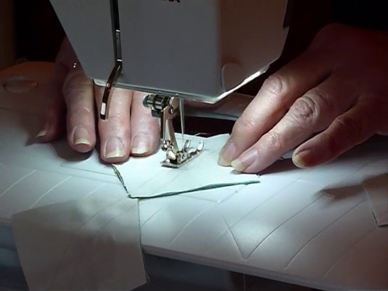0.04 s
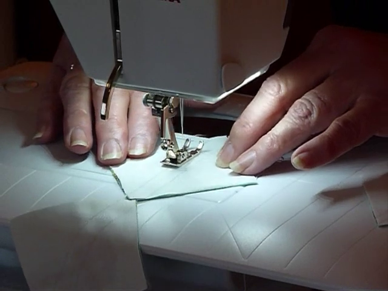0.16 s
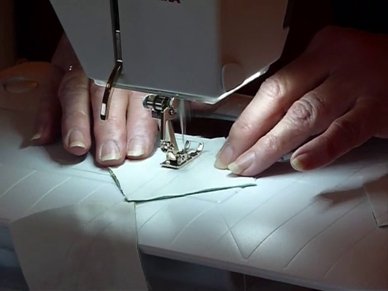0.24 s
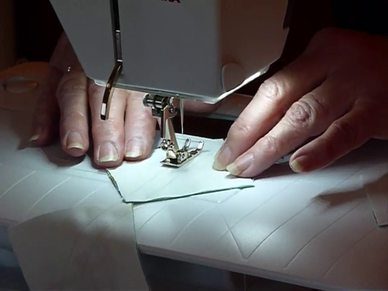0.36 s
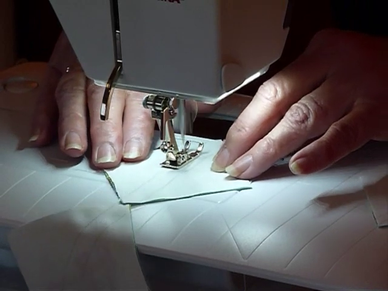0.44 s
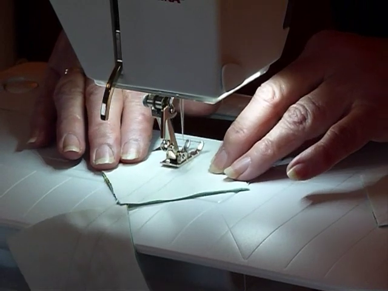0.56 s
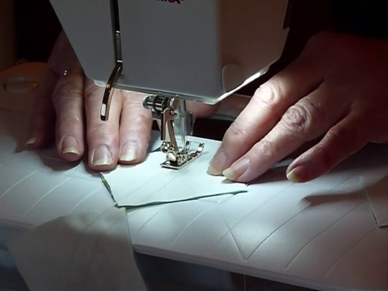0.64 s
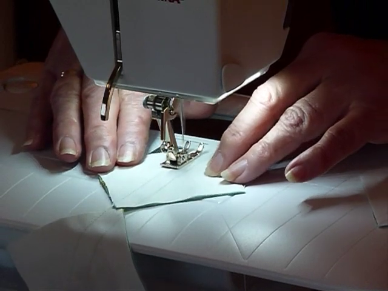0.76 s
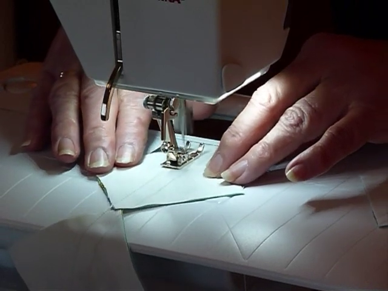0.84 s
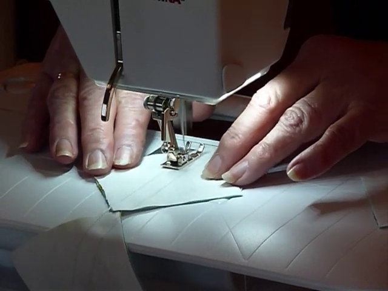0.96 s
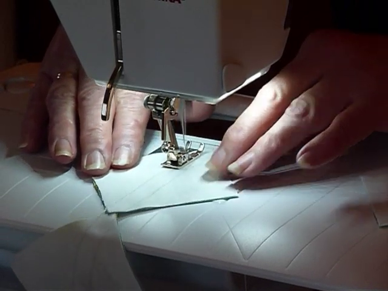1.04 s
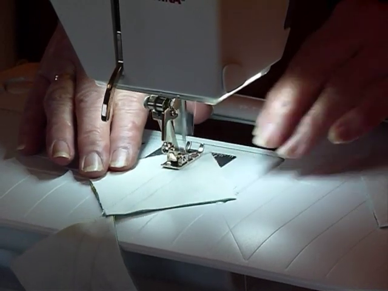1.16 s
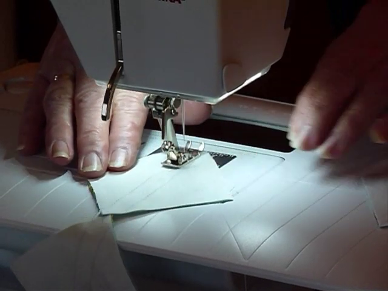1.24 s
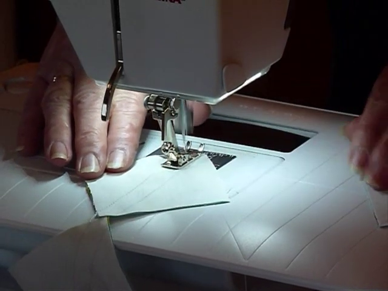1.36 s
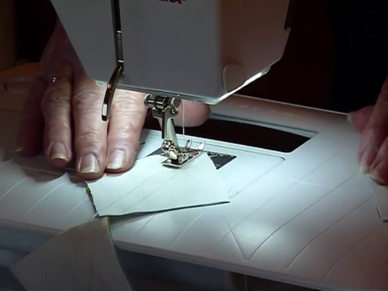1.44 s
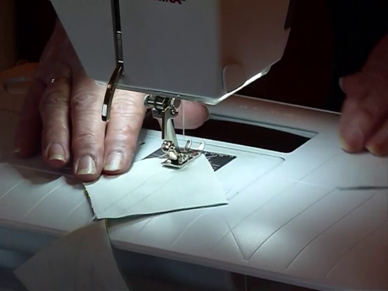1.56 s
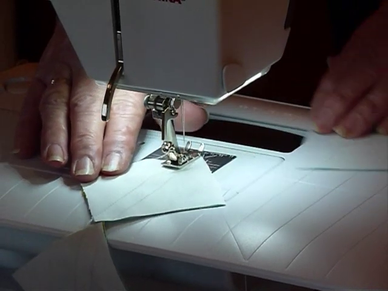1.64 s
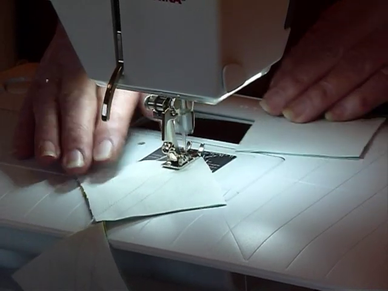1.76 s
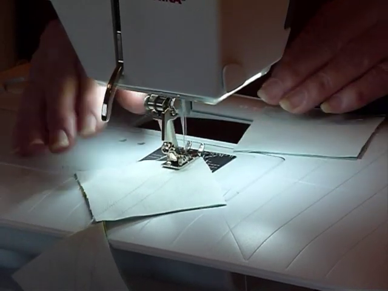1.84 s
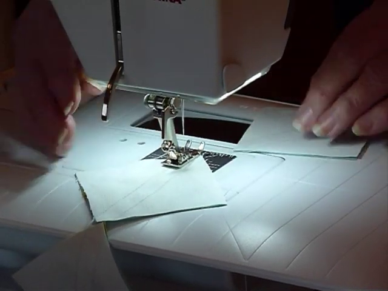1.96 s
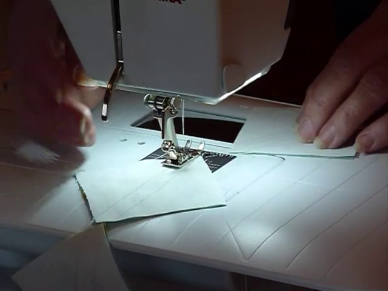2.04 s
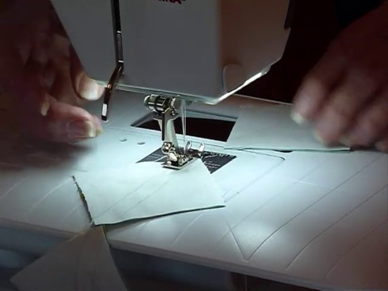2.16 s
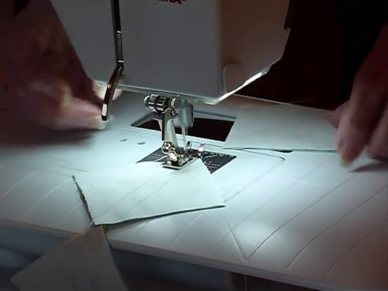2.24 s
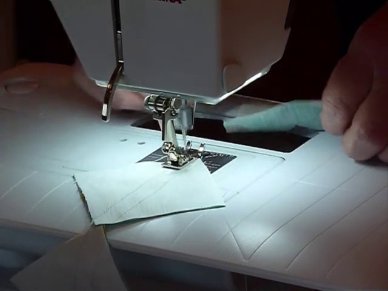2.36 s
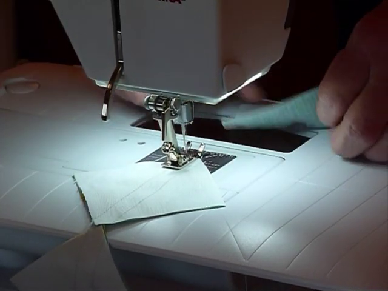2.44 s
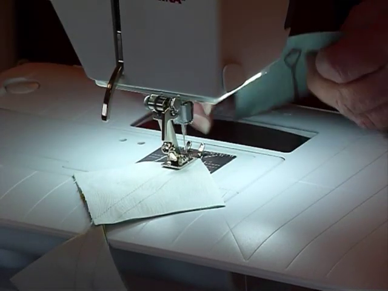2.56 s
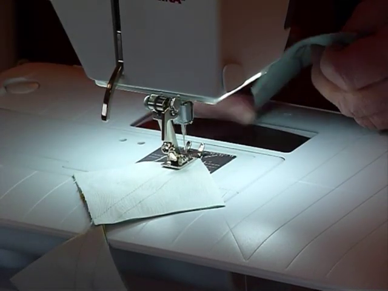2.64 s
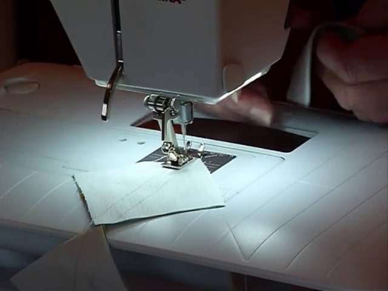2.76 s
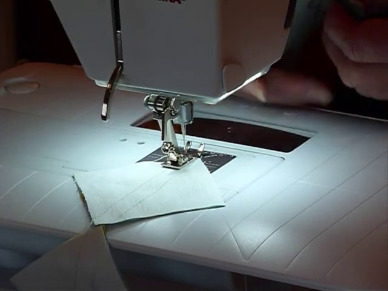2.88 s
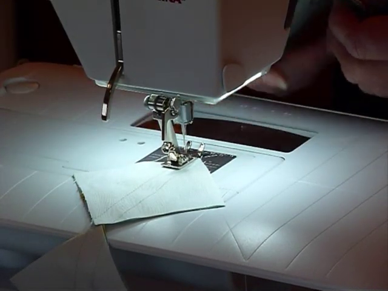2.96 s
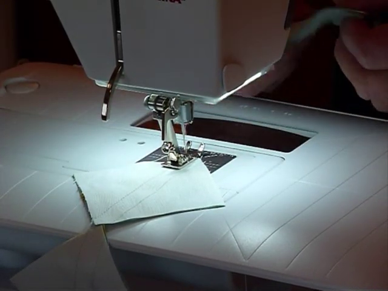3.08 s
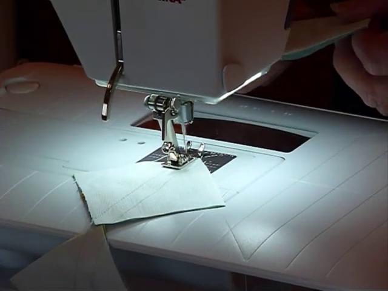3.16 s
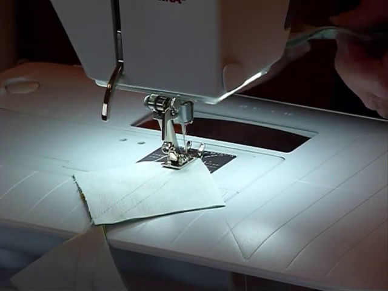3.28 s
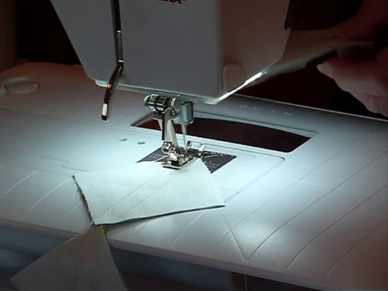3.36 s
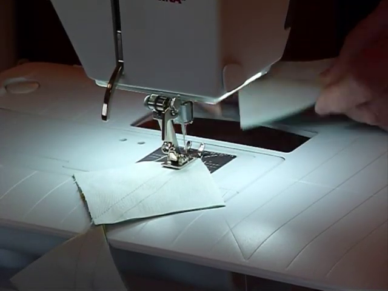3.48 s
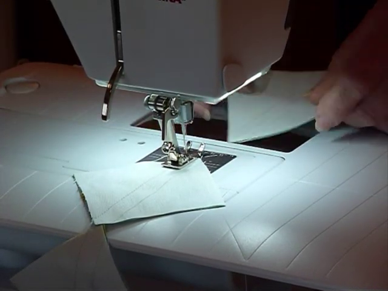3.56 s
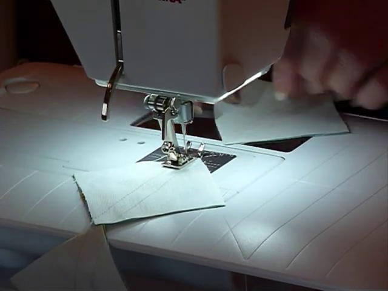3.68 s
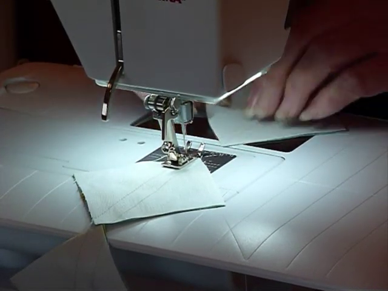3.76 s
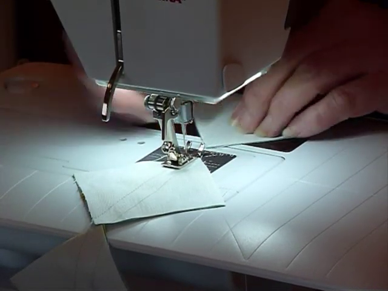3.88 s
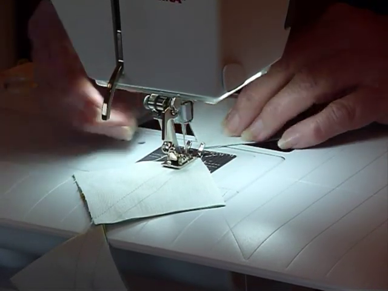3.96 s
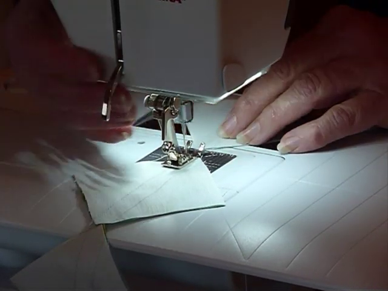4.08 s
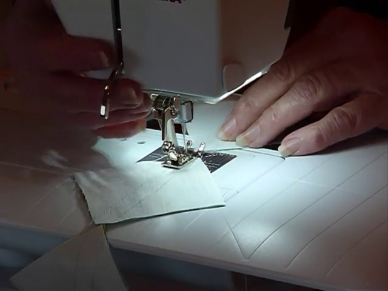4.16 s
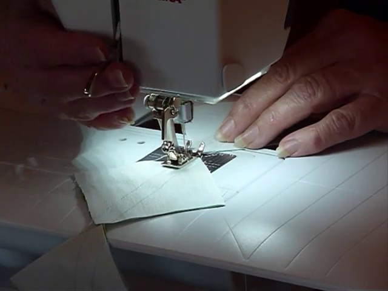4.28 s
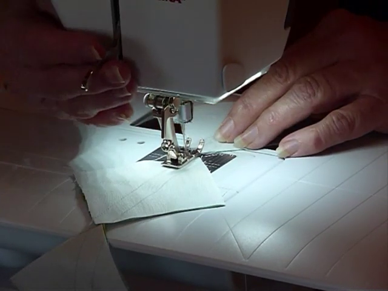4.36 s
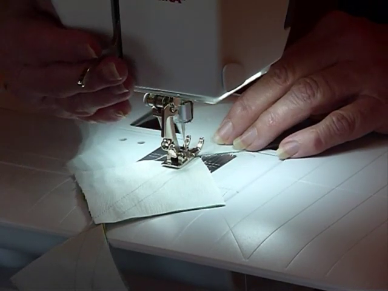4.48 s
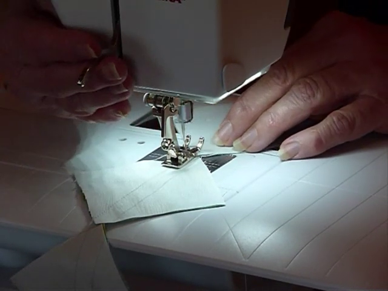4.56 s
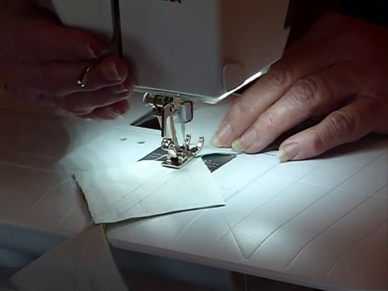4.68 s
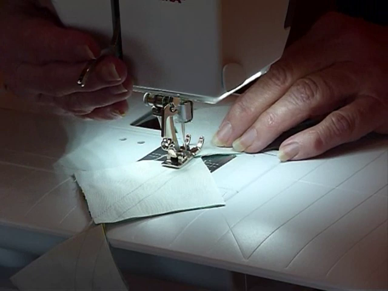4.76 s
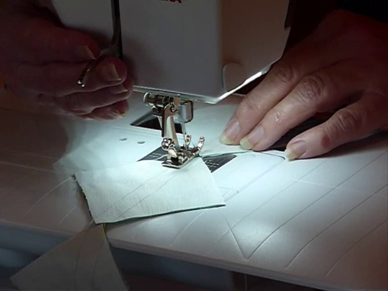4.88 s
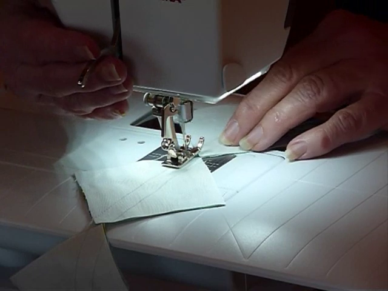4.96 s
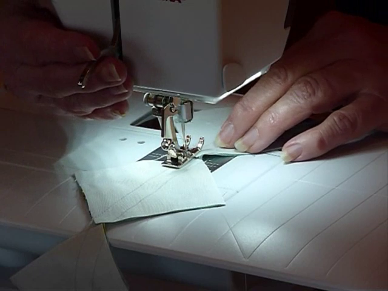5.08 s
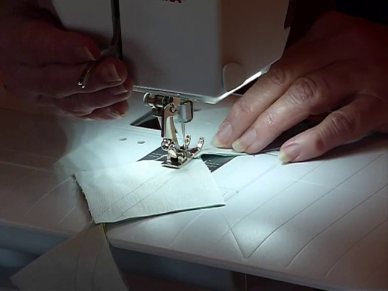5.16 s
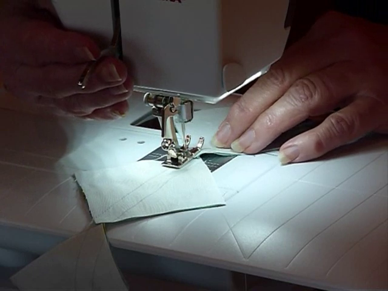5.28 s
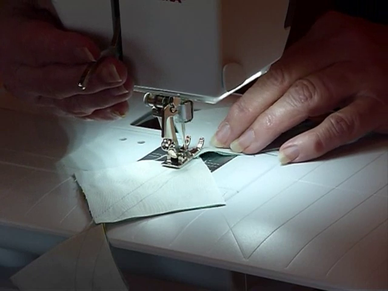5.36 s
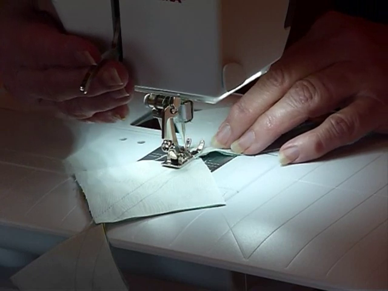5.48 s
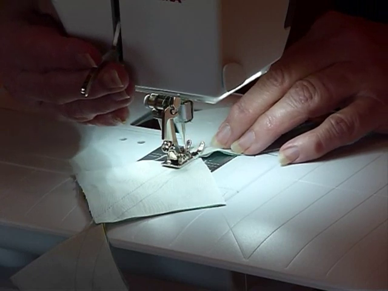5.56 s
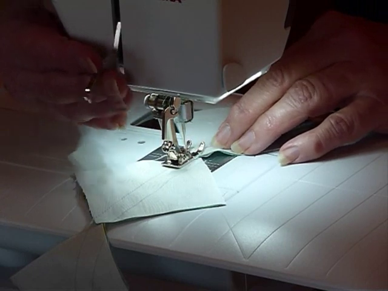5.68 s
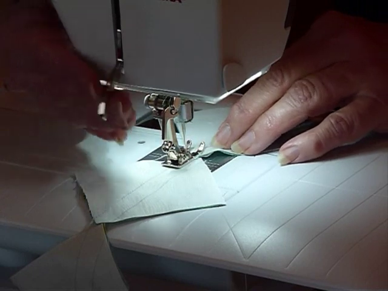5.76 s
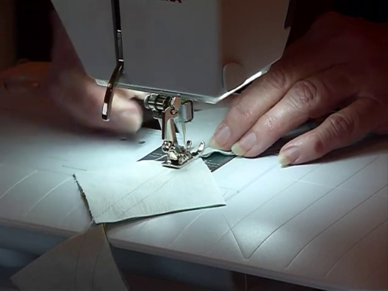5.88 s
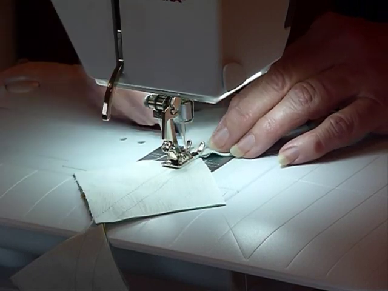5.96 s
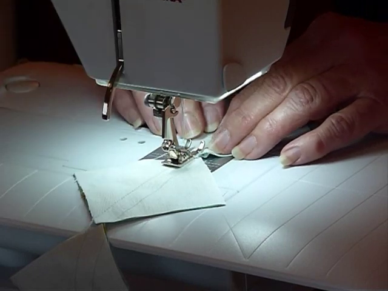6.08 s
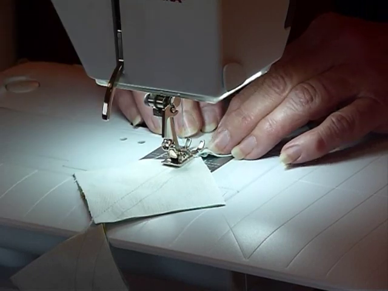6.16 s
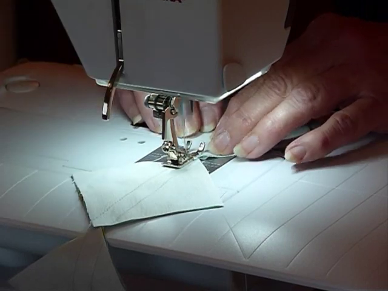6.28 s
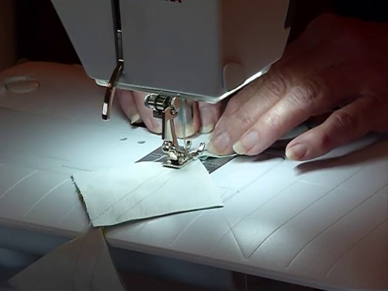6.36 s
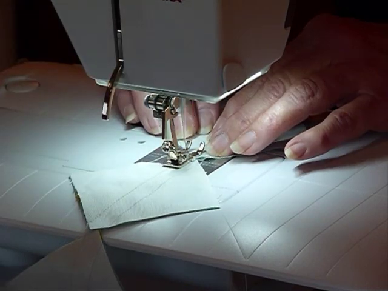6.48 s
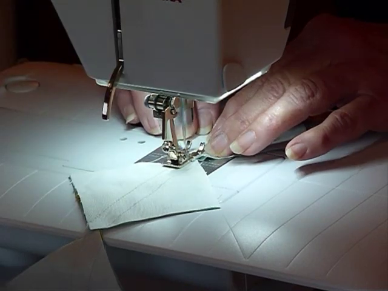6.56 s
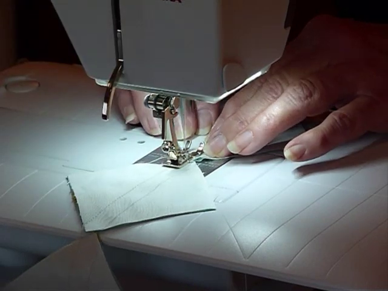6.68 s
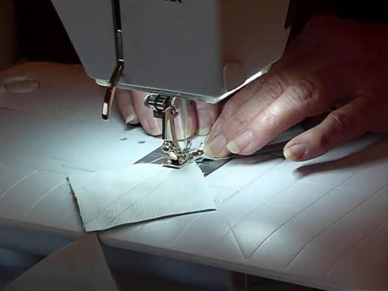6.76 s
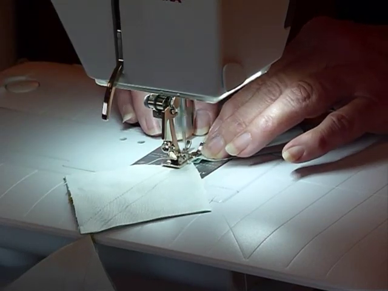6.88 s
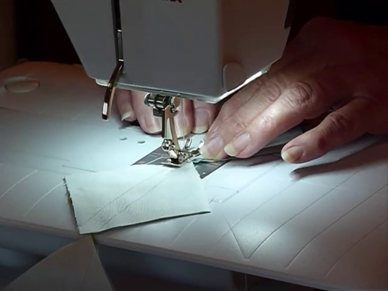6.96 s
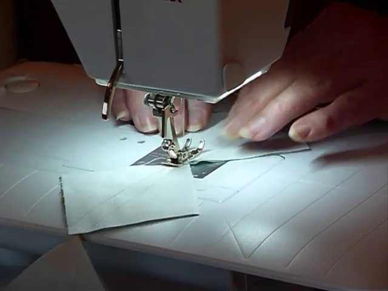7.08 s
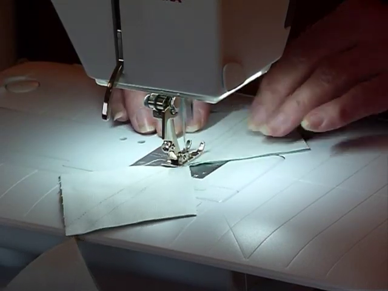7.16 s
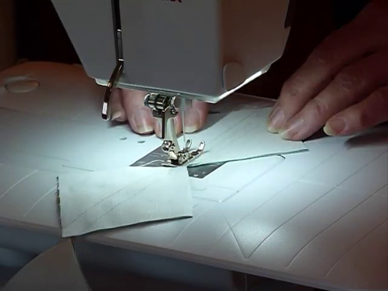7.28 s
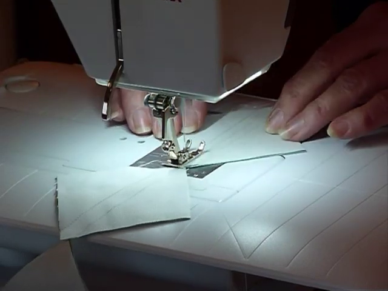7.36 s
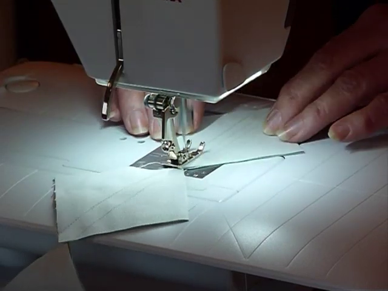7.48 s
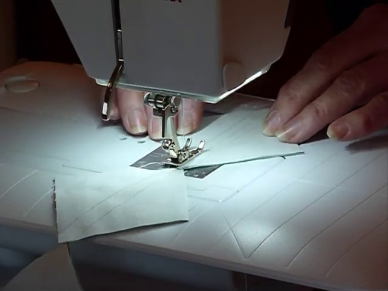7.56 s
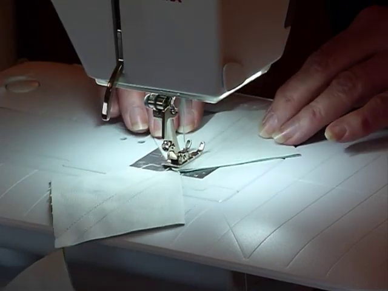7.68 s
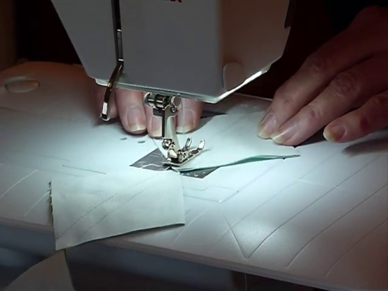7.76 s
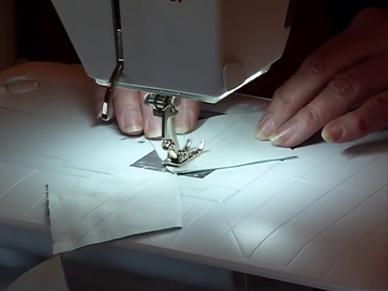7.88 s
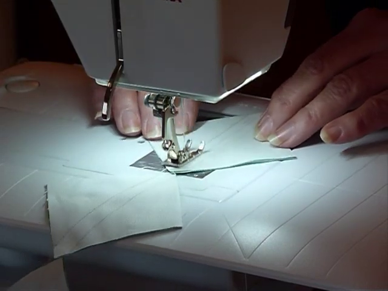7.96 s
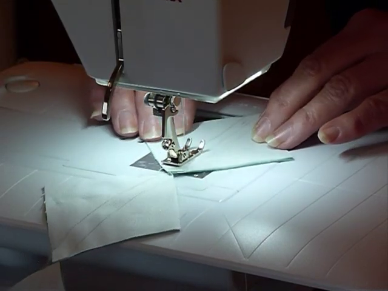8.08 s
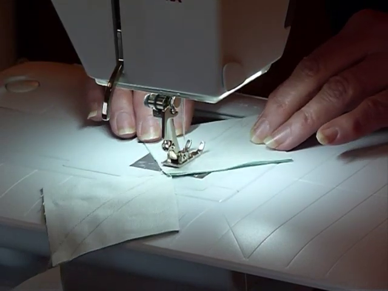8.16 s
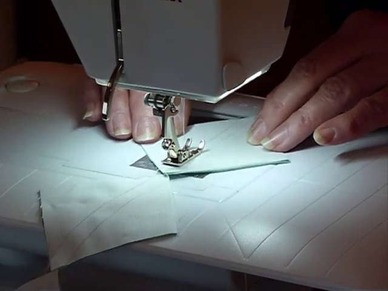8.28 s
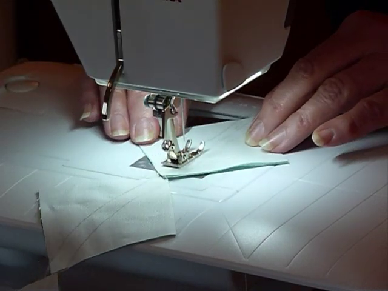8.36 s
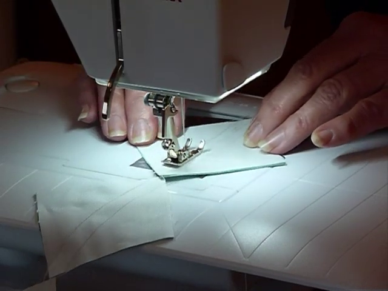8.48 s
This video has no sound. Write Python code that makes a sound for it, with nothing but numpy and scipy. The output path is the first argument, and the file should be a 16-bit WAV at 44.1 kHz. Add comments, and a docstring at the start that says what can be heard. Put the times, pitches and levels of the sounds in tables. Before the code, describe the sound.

Brisk mechanical stitching winds down and stops on a bright latch snap; soft table bumps and presser-foot clicks follow before the machine speeds up again.

```python
"""An electric sewing machine stitches patchwork in a small room, slows down and halts with a sprung metal clack.
Hands fetch the next piece and bump the table, the presser foot is lifted and dropped, and the machine runs up again.
The shaft angle times everything that turns: a round of noise knocks, ringing bed and plate, whirr, hum and whine.
Single blows are dying noise bursts or ringing modes; cloth, straining motor and room air are coloured noise."""
import sys
import numpy as np
from scipy import signal
from scipy.fft import rfft, irfft, next_fast_len
from scipy.io import wavfile
from scipy.ndimage import uniform_filter1d

SR = 44100
rng = np.random.default_rng(int(sys.argv[2]) if len(sys.argv) > 2 else 0)


def pcm_store(signal):
    """Save signal as 16-bit PCM."""
    levels = np.round(np.clip(np.atleast_2d(signal), -1, 1) * 32767)
    wavfile.write(sys.argv[1], SR, levels.astype(np.int16).T)


N = 376173

# Shaft speed set by the pedal. Each row: time in seconds, speed in stitches per second.
FIRST_RUN = [(-.1, 9.5), (1.448, 9.44), (1.83, 4.09), (2.36, 1.66)]
SECOND_RUN = [(6.121, 1.93), (6.575, 4.95), (6.863, 5.55), (7.07, 7.98), (7.46, 8.08), (7.7, 9.48),
              (8.54, 9.5)]
# Each run: its speed table, shaft angle at its start in turns; one turn is one stitch.
RUNS = [(FIRST_RUN, .056), (SECOND_RUN, .35)]
# Low, middle, upper and top register. Each row: lower edge in Hz, upper edge in Hz.
REGISTERS = [(150, 450), (450, 1300), (1300, 3000), (3000, 9000)]
FULL_RATE = 9.5  # stitches per second
BRISK_SPEED = .83  # share of full speed at which bed and plate shake most
ROOM_T60_S = 0.38
TIME = np.arange(N) / SR
AGE = np.arange(SR // 4) / SR  # seconds since a blow
FREQS = np.maximum(np.arange(2049) * SR / 4096, 1)


def from_db(db):
    """Decibels to gain."""
    return 10 ** (np.asarray(db) / 20)


def gains(spectrum):
    """A table of (Hz, dB) as a gain at every frequency, drawn straight over log frequency."""
    hz, db = np.transpose(spectrum)
    return from_db(np.interp(np.log(FREQS), np.log(hz), db))


def filtered(x, gain):
    """Causal (minimum-phase) filter with the given gains, made by folding the cepstrum."""
    cepstrum = irfft(np.log(gain + 1e-6))
    half = len(cepstrum) // 2
    fold = np.r_[1, np.full(half - 1, 2), 1, np.zeros(half - 1)]
    impulse = irfft(np.exp(rfft(cepstrum * fold)))
    return signal.oaconvolve(np.atleast_2d(x), impulse[None], axes=1)[:, :N]


def coloured(x, gain):
    """Colours white sound and keeps its power."""
    return filtered(x, gain / np.sqrt(np.mean(gain ** 2)))


def white(size=N):
    """White noise in mid and side."""
    return rng.standard_normal((2, size))


def add(track, s, sound):
    """Mixes a sound in at a time."""
    start = round(s * SR)
    first, last = max(start, 0), min(start + sound.shape[-1], N)
    if last > first:
        track[..., first:last] += sound[..., first - start:last - start]


def swells(rows):
    """Gain of smooth swells given as (middle s, half length s, dB)."""
    power = 0
    for s, half, db in rows:
        power = power + from_db(2 * db) * np.exp(-2 * np.minimum(((TIME - s) / half) ** 2, 20))
    return np.sqrt(power)


def dying(t60, room_db, rise_s):
    """Envelope of a blow: a quick rise, the part's own short ring, then the room."""
    own = from_db(-60 * AGE / max(t60, .005))
    room = from_db(room_db - 60 * AGE / ROOM_T60_S)
    return np.hypot(own, room) * (1 - np.exp(-AGE / rise_s))


def blows(rows, colour, t60, room_db, push_db, rise_s=0.0022):
    """A row of blows on one object: the clean push of each contact, then its dying ring."""
    drive = np.zeros((2, N))
    for s, db in rows:
        blow = dying(t60, room_db, rise_s) * white(len(AGE))
        blow[0, 0] = from_db(push_db)
        add(drive, s, from_db(db) * blow)
    return coloured(drive, colour)


def ringing(rows, modes, level_db):
    """Struck metal: every touch sets each mode ringing with a strength of its own."""
    out = np.zeros((2, N))
    for s, db in rows:
        for hz, mode_db, t60 in modes:
            decay = from_db(db + mode_db + level_db - 60 * AGE / t60)
            tone = decay * np.sin(2 * np.pi * hz * AGE)
            strength = rng.normal(1, 1.0, (2, 1)) * rng.choice([-1, 1], (2, 1))
            add(out, s, strength * tone)
    return out


def housing(ripple_db=2.5):
    """Gain of the plastic housing: broad resonances and a ripple of many small modes."""
    # Colour of the housing. Each row: frequency in Hz, relative level in dB.
    colour = [(30, -29), (65, -6.5), (115, -16.5), (160, -25), (215, -4.5), (280, -11.5), (480, -4.5),
              (750, -4.5), (1000, -4.5), (1500, -15), (2500, -21.5), (4000, -13), (6200, -11.5),
              (7600, -26)]
    # Its resonances. Each row: frequency in Hz, width in Hz, height in dB.
    resonances = [(232.6, 32, 6.5), (328, 43, 10.5), (652, 150, 4.5), (853, 58, 5), (2050, 360, 0.5),
                  (2836, 220, 4), (3047, 130, 3.5), (3460, 47, 5), (4720, 400, -5)]
    peaks = sum(db / (1 + (2 * (FREQS - hz) / width) ** 2) for hz, width, db in resonances)
    ripple = uniform_filter1d(rng.standard_normal(len(FREQS)), size=4) * np.sqrt(4)
    ripple *= np.minimum(FREQS / 1500, 1)  # the ripple fades out towards the bass
    return gains(colour) * from_db(peaks + ripple_db * ripple)


def through_housing(drives, body):
    """Each register of the housing sounds its own drive."""
    out = np.zeros((2, N))
    for drive, (low, high) in zip(drives, REGISTERS):
        band = 1 / np.sqrt((1 + (low / FREQS) ** 10) * (1 + (FREQS / high) ** 10))
        out += coloured(drive, body * band)
    return out


def shaft(run, start):
    """Angle in turns, and speed as a share of the full stitching rate (0 at rest)."""
    s, rates = np.transpose(run)
    rate = np.interp(TIME, s, rates, left=0, right=0)
    already = max(-s[0], 0) * rates[0]  # turned before time zero
    return start + already + np.cumsum(rate) / SR, rate / FULL_RATE


def passes(angle, at_turns):
    """Samples at which the shaft comes by a given angle."""
    return np.flatnonzero(np.diff(np.floor(angle - at_turns)) > 0)


def pull_of(speed):
    """How hard the motor pulls: stitches per s gained in a second, limited to 2 and smoothed."""
    return uniform_filter1d(np.clip(np.gradient(speed) * FULL_RATE * SR, 0, 2), size=SR // 5)


def stitching(body, scatter_db=1.68, level_db=-1.87, pull_db=-0.8):
    """Needle bar, hook and feed knock at set shaft angles, much alike each turn, harder with speed."""
    # Contacts in one turn; sprung ones still snap at a crawl (small exponent).
    # Each row: angle in turns, low, middle, upper and top register in dB before the trim, speed exponent.
    contacts = [(.945, -44, -33.5, -36.5, -36, 1.1), (.995, -37.5, -29, -37, -45, 0.8),
                (.045, -37.5, -33, -35, -34.5, 1.4), (.125, -37, -28, -54, -46.5, 0.9),
                (.27, -41.5, -28.5, -49.5, -46.5, 2), (.355, -46.5, -49.5, -34, -32, 2.2),
                (.46, -43, -30.5, -47.5, -39.5, 2.9), (.52, -49.5, -29.5, -33.5, -37, 1.5),
                (.595, -43.5, -27, -40.5, -48, 1.7), (.645, -40.5, -27.5, -41.5, -38.5, 1.7),
                (.73, -47, -23, -45, -45, 2.8), (.785, -44, -34, -41, -35.5, 1.2)]
    # Share of the noise power that repeats on every turn, one value per register.
    repeating = [.92, .88, .72, .5]
    drives = np.zeros((len(REGISTERS), 2, N))
    low = from_db(-4) * dying(t60=0.093, room_db=-15, rise_s=0.0012)
    high = dying(t60=0.061, room_db=-9, rise_s=0.0012)
    envelopes = np.array([low, low, high, high])[:, None]
    alike = np.array(repeating)[:, None, None]
    # the two lower registers also get the clean push of the contact itself
    push = np.zeros((len(REGISTERS), 2, len(AGE)))
    push[:2, 0, 0] = from_db([16, 17])
    for run in RUNS:
        angle, speed = shaft(*run)
        pull = np.zeros(N)
        pull[speed > 0] = pull_of(speed[speed > 0])
        for at_turns, *levels, exponent in contacts:
            own_ring = np.sqrt(alike) * white(len(AGE))
            for i in passes(angle, at_turns):
                trim_db = level_db + pull_db * pull[i] + scatter_db * rng.standard_normal()
                force = speed[i] ** exponent * from_db(np.array(levels) + trim_db)
                ring = own_ring + np.sqrt(1 - alike) * white(len(AGE))
                add(drives, i / SR, force[:, None, None] * (push + envelopes * ring))
    return through_housing(drives, body)


def thumps(modes, at_turns, level_db, exponent, easing, rise_s, scatter_db=1.6, detune=.02):
    """Once a stitch a stroke sets a part ringing, never quite alike; hardest at a brisk speed, easing above it."""
    out = np.zeros((2, N))
    attack = 1 - np.exp(-AGE / rise_s)
    for run in RUNS:
        angle, speed = shaft(*run)
        for i in passes(angle, at_turns):
            hard, sharp = rng.standard_normal(2)
            thump = np.zeros(len(AGE))
            for hz, db, t60 in modes:
                decay = from_db(db + level_db + scatter_db * hard - 60 * AGE / t60)
                thump += decay * np.sin(2 * np.pi * hz * (1 + detune * sharp) * AGE)
            brisk = speed[i] / BRISK_SPEED
            add(out[0], i / SR, min(brisk ** exponent, brisk ** -easing) * attack * thump)
    return out


def bed_thumps():
    """A firm, round thump in the bed and a softer return, once a stitch: decaying low modes."""
    # Modes of the bed under the needle. Each row: frequency in Hz, relative level in dB, t60 in seconds.
    modes = [(66, -22, 0.12), (108, -19, 0.1), (226, 7, 0.075), (305, -4, 0.05)]
    # The needle stroke and its return. Each row: angle in turns, level in dB.
    strokes = [(.03, -28), (.68, -37)]
    return sum(thumps(modes, at_turns, db, exponent=8, easing=1.6, rise_s=.008) for at_turns, db in strokes)


def plate():
    """The needle plate sings under three knocks of each stitch."""
    # Modes of the plate. Each row: frequency in Hz, relative level in dB, t60 in seconds.
    modes = [(728, -1.5, 0.07), (824, 4.5, 0.09), (874, 6.5, 0.09), (996, -4.5, 0.05)]
    # Knocks that reach the plate. Each row: angle in turns, level in dB.
    strokes = [(.12, -32), (.47, -41), (.68, -35)]
    return sum(thumps(modes, at_turns, db, exponent=1.5, easing=2.0, rise_s=.003) for at_turns, db in strokes)


def needle_ticks(exponent=0.68):
    """Twice a turn the sprung linkage of the needle bar ticks brightly, harder as the shaft speeds up."""
    # Each row: angle in turns, level in dB at full speed before the ring's own trim.
    ticks = [(0.92, -46), (0.38, -43.5)]
    # Modes of the linkage. Each row: frequency in Hz, relative level in dB, t60 in seconds.
    modes = [(2804, -1.5, 0.08), (3038, -1.5, 0.077), (3280, -3, 0.053), (3480, -6.5, 0.05)]
    rows = []
    for run in RUNS:
        angle, speed = shaft(*run)
        for at_turns, db in ticks:
            for i in passes(angle, at_turns):
                rows.append((i / SR, db + 20 * exponent * np.log10(speed[i])))
    return ringing(rows, modes, level_db=2.0)


def motor(body, repeats=0.5, throb=0.15, whine_order=444, flutter_hz=48, wobble_hz=75):
    """Belt and gears whirr, throbbing six times a stitch; the drive hums and the motor whines with the shaft."""
    # Whirr at full rate, one level in dB per run.
    whirr_levels = [-31.5, -32.5]
    # Hum of the drive. Each row: cycles per shaft turn, relative level in dB.
    orders = [(7, -55), (11, -59), (12, -57), (20, -50), (23, -51), (24, -49), (32, -47), (33, -45),
              (36, -45), (39, -45), (57, -41), (71, -44), (75, -41), (87, -40), (89, -42), (136, -47),
              (148, -49), (171, -52)]
    whirr, hum, whine = np.zeros((3, 2, N))
    uneven = coloured(white(), 1 / (1 + (FREQS / flutter_hz) ** 2))[0]
    for run, whirr_db in zip(RUNS, whirr_levels):
        angle, speed = shaft(*run)
        on = speed > 0
        angle, speed = angle[on], speed[on]
        # the same unevenness of the teeth comes round on every turn
        teeth = white(round(SR / FULL_RATE))
        place = (angle % 1 * teeth.shape[1]).astype(int) % teeth.shape[1]
        worn = teeth[:, place] * np.sqrt(speed)
        rubbing = np.sqrt(repeats) * worn + np.sqrt(1 - repeats) * white(len(speed))
        # louder with speed, and with the pull of speeding up
        level = speed ** 1.67 * from_db(whirr_db + 1.4 * pull_of(speed))
        whirr[:, on] += rubbing * level * (1 + throb * np.cos(2 * np.pi * 6 * angle))
        tones = np.zeros(len(speed))
        for order, db in orders:
            tones += from_db(db - 2.5) * np.sin(2 * np.pi * (order * angle + rng.random()))
        hum[0, on] += speed ** 3.05 * tones
        # towards full rate the motor runs unevenly and its whine blurs
        wobble = np.cumsum(wobble_hz * speed ** 6 * uneven[on]) / SR
        # the whine sets in sharply just below .84 of full speed
        onset = np.minimum(speed / .84, 1) ** 32
        whine[:, on] += onset * np.sin(2 * np.pi * (whine_order * angle + wobble))
    waver = 1 + .85 * coloured(white(), 1 / (1 + (FREQS / flutter_hz) ** 4))
    # dulled above 2300 Hz, thinned below 330 Hz
    softness = 1 / (1 + (FREQS / 2300) ** 2) / np.hypot(1, 330 / FREQS)
    return coloured(whirr, body * softness) + hum + from_db(-51) * whine * waver


def motor_buzz(level_db=-55.0, buzz_hz=245, width_hz=55):
    """The powered motor buzzes at one pitch and level: narrow noise, bared when the shaft is at a crawl."""
    running = sum(shaft(*run)[1] > 0 for run in RUNS) * 1.
    powered = uniform_filter1d(running, size=SR // 20)
    buzz = coloured(white(), 1 / (1 + (2 * (FREQS - buzz_hz) / width_hz) ** 2))
    return from_db(level_db) * powered * buzz


def room_air(level_db=-59.5):
    """The quiet room: steady coloured noise."""
    # Each row: frequency in Hz, relative level in dB.
    colour = [(15, -31), (25, -8.5), (70, -4), (162, -0.5), (215, -3.5), (301, -8), (323, -7), (534, -10.5),
              (679, -12.5), (765, -6.5), (1020, -15), (1180, -13.5), (1940, -24), (5180, -20.5),
              (7600, -28.5), (9880, -74.5), (16700, -120)]
    return from_db(level_db) * coloured(white(), gains(colour))


def table_bumps():
    """Soft bumps on the table: a strong push and a low, woody noise ring."""
    # Each row: start in seconds, level in dB.
    bumps = [(.925, -38), (2.013, -31), (2.483, -39.5), (2.565, -48), (2.728, -52), (2.780, -36.5)]
    # Colour of the table. Each row: frequency in Hz, relative level in dB.
    colour = [(35, -33), (55, -26), (80, -3.5), (115, 1.5), (170, -3.5), (260, -11.5), (700, -13.5),
              (1200, -56), (3000, -46)]
    return blows(bumps, gains(colour), t60=0.14, room_db=-11.5, push_db=23.0)


def cloth():
    """Soft rubbing while the next piece is fetched and laid: swelling noise."""
    # Cloth sliding under the fingers. Each row: middle in seconds, half length in seconds, level in dB.
    strokes = [(2.6, 0.15, -54), (3.2, 0.96, -63), (4.2, 0.43, -62), (5.85, 0.024, -59.5)]
    # Each row: frequency in Hz, relative level in dB.
    colour = [(180, -23), (300, 2.5), (488, -9), (763, -1.5), (1630, -16.5), (1890, -21.5), (5130, -14.5),
              (7600, -22.5), (9880, -66), (16700, -120)]
    return coloured(swells(strokes) * white(), gains(colour))


def knocks(body, level_db=1.5, room_db=-15, rise_s=0.0046):
    """Single blows on the machine: dull thuds, and clicks that differ in brightness, as dying noise."""
    # Clicks of levers and linkage.
    # Each row: start in seconds, level in dB before the trim, brightness in dB per register, t60 in seconds.
    clicks = [(1.747, -38.5, -1.5, 0.11), (1.885, -55, -8, 0.11), (2.137, -48, -5, 0.14),
              (2.204, -35.5, -1, 0.016), (2.325, -36, -2, 0.03), (2.390, -49, -6, 0.51),
              (4.230, -45.5, -3, 0.037), (4.342, -49.5, -2, 0.13), (4.368, -50, -4.5, 0.3),
              (4.498, -53, -0.5, 0.05), (4.70, -58, -2.5, 0.11), (4.876, -61.5, -0.5, 0.22),
              (5.872, -46.5, 7.5, 0.091), (5.880, -35, -2.5, 0.036), (6.120, -41.5, 0, 0.21),
              (6.345, -48.5, -2, 0.44), (6.454, -42.5, -1, 0.11), (6.578, -42.5, 1.5, 0.19),
              (6.662, -43.5, 1.5, 0.11), (6.77, -36, 4.5, 0.072), (6.853, -37.5, -1, .08),
              (6.949, -37, 1, 0.07)]
    # Thuds of hands and mechanism. Each row: start in seconds, level in dB before the trim, t60 in seconds.
    thuds = [(2.001, -35.5, 0.075), (2.373, -22, 0.02), (2.482, -38.5, 0.042), (3.589, -57, 0.11),
             (3.633, -62.5, 0.51), (3.932, -50, 0.27)]
    # Relative level in dB of the low, middle, upper and top register.
    click_colour = [-1.2, 0.46, -0.61, -0.76]
    thud_colour = [1.5, 2, -41, -27]
    drives = np.zeros((len(REGISTERS), 2, N))
    steps = np.arange(len(REGISTERS)) - (len(REGISTERS) - 1) / 2
    hits = [(s, db + np.array(thud_colour), t60) for s, db, t60 in thuds]
    for s, db, bright_db, t60 in clicks:
        hits.append((s, db + np.array(click_colour) + bright_db * steps, t60))
    for s, levels, t60 in hits:
        force = from_db(levels + level_db)[:, None, None]
        add(drives, s, force * dying(t60, room_db, rise_s) * white(len(AGE)))
    return through_housing(drives, body)


def clink():
    """A small metal thing is jolted by the heaviest bump: two touches of three high modes."""
    touches = [(2.016, -40), (2.019, -40.5)]  # (s, dB)
    modes = [(2840, 2, 0.06), (2950, 4, 0.045), (3320, 1, 0.056)]  # (Hz, dB, t60 s)
    return ringing(touches, modes, level_db=-4)


def latch():
    """The latch snaps and chatters as bright noise and its spring rings on, near the middle of the image."""
    # The snap, the chatter and the settling. Each row: start in seconds, level in dB.
    touches = [(2.3735, -27.5), (2.3855, -29), (2.391, -30), (2.399, -28), (2.4055, -30.5), (2.413, -32),
               (2.421, -37), (2.433, -34), (2.462, -42.5)]
    # Each row: frequency in Hz, relative level in dB.
    colour = [(900, -29), (1600, -9.5), (2500, -6), (4200, 2.5), (5250, 8), (6000, -2), (7300, -3.5),
              (8500, -68)]
    # Modes of the spring. Each row: frequency in Hz, relative level in dB, t60 in seconds.
    spring = [(2360, -14, 0.18), (2880, -6.5, 0.13), (3661, -13, 0.15), (4226, -7, 0.14),
              (4980, 4.5, 0.086), (5200, -6, 0.12), (5850, -14, .12), (5440, 1.5, 0.13), (6794, -9.5, 0.13)]
    chatter = blows(touches, gains(colour), t60=0.098, room_db=-19, push_db=17, rise_s=0.00088)
    return (chatter + ringing(touches, spring, level_db=-10.5)) * from_db([[0], [-4]])


def palm():
    """The hollow bed booms in a few low modes as a hand is put down on it."""
    # Each row: start in seconds, level in dB before the ring's own trim.
    touches = [(3.933, -40)]
    # Modes of the bed. Each row: frequency in Hz, relative level in dB, t60 in seconds.
    modes = [(285, -10, 0.204), (351, -8, 0.3), (388, -2, 0.26), (440, -7.5, 0.36), (503, -8, .2),
             (583, -15, 0.31)]
    return ringing(touches, modes, level_db=-0.5) * from_db([[0], [-14]])


def presser_foot():
    """The lever knocks, and the sprung bar rings when the foot hits its stop or the plate."""
    # The lever knocks in the housing as it is raised. Each row: start in seconds, level in dB.
    lever_knocks = [(4.368, -39), (4.379, -43), (4.414, -41)]
    # Each row: frequency in Hz, relative level in dB.
    lever_colour = [(200, -29), (600, 2), (1200, 3), (1900, -11), (3000, -11), (7500, -25)]
    # The foot is lifted and dropped. Each row: start in seconds, level in dB before the ring's own trim.
    foot_hits = [(4.368, -38.5), (4.379, -44.5), (5.874, -42), (5.884, -41.5)]
    # Modes of its bar. Each row: frequency in Hz, relative level in dB, t60 in seconds.
    bar = [(693, -5, 0.24), (847, 6, 0.057), (1102, -0.5, 0.18), (1310, -20, 0.1), (3050, -32, 0.075),
           (5550, -3, 0.074), (5830, -13, 0.053), (7100, -14, 0.052)]
    lever = blows(lever_knocks, gains(lever_colour), t60=0.059, room_db=-12, push_db=10, rise_s=.001)
    return lever + ringing(foot_hits, bar, level_db=-2.0) * from_db([[0], [-8]])


def stalled_motor(body, dull_hz=1200):
    """The motor growls as the pedal goes down and as the shaft breaks loose: dull swells of noise."""
    # Each row: middle in seconds, half length in seconds, level in dB.
    strains = [(5.99, 0.12, -53.5), (6.18, 0.056, -40.5)]
    return coloured(swells(strains) * white(), body / (1 + (FREQS / dull_hz) ** 4))


def catches():
    """The feed catches under load with hollow clacks while the machine gathers speed: short noise blows."""
    # Each row: start in seconds, level in dB.
    clacks = [(6.283, -45), (6.533, -39), (6.912, -35)]
    # Each row: frequency in Hz, relative level in dB.
    colour = [(400, -30), (1100, 7), (1700, -1), (2800, -5), (3800, -11), (7500, -18)]
    return blows(clacks, gains(colour), t60=0.083, room_db=-13, push_db=4, rise_s=.001)


def stereo(mid, side):
    """Spreads mid and side to left and right: the side mixes free sound with a phase-turned mid."""
    # Width of the image. Each row: frequency in Hz, side gain in dB.
    width = [(60, -24.5), (93, -27.5), (140, -21.5), (220, -20.5), (350, -13.5), (540, -8), (840, -5.5),
             (1300, -2), (2010, 5), (3120, 1), (4850, -4), (7520, -10)]
    # Balance of the image. Each row: frequency in Hz, left over right in dB.
    balance = [(60, -2), (100, -1.5), (180, -3), (300, -3), (510, -6), (880, -5), (1500, -4), (2570, 6),
               (4400, 7), (7520, 3)]
    # share of the side that is independent of the mid
    diffuse = np.interp(FREQS, [500, 2000], [0.63, 0.81])
    turned = np.imag(signal.hilbert(mid, next_fast_len(N)))[:N]  # a quarter cycle late
    free = filtered(side, gains(width) * diffuse)
    side = free + filtered(turned, gains(width) * np.sqrt(1 - diffuse ** 2))
    lean = np.sqrt(gains(balance))
    return np.vstack([filtered(mid + side, lean), filtered(mid - side, 1 / lean)])


def scene():
    """All sources as mid and side, then spread to left and right."""
    body = housing()
    turning = stitching(body) + bed_thumps() + plate() + needle_ticks()
    drive = motor(body) + motor_buzz() + stalled_motor(body)
    handling = knocks(body) + clink() + latch() + palm() + presser_foot() + catches()
    surroundings = room_air() + table_bumps() + cloth()
    mid, side = turning + drive + handling + surroundings
    return stereo(mid, side)


def record(dry):
    """The microphone thins the bass below 48 Hz; the recorder cuts the top steeply above 7700 Hz."""
    thinned = signal.sosfilt(signal.butter(2, 48, "high", fs=SR, output="sos"), dry)
    # 0.2 dB of ripple below the cut, 70 dB of loss above it
    return signal.sosfilt(signal.ellip(10, .2, 70, 7700, fs=SR, output="sos"), thinned)


dry = scene()
out = record(dry)
pcm_store(out)
```